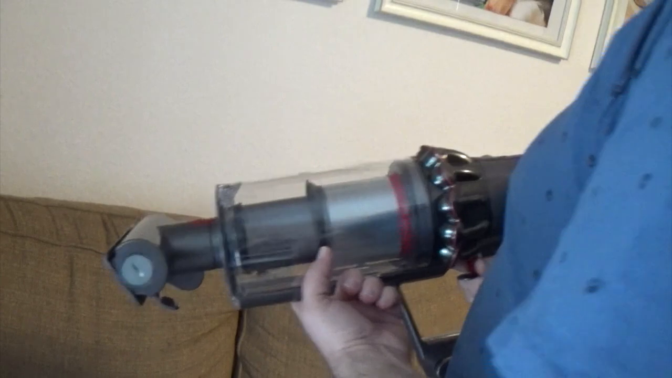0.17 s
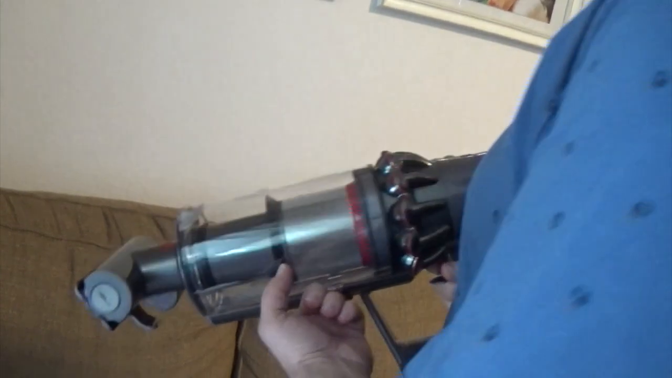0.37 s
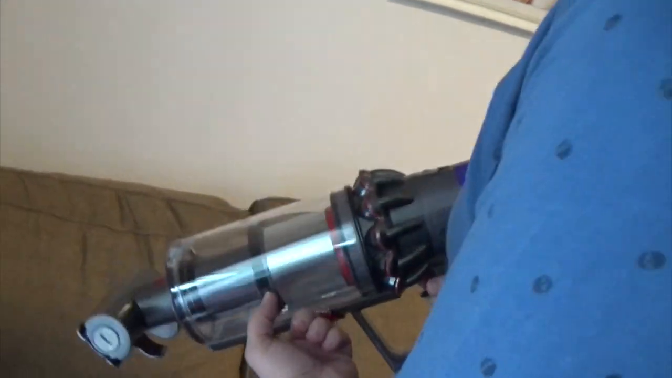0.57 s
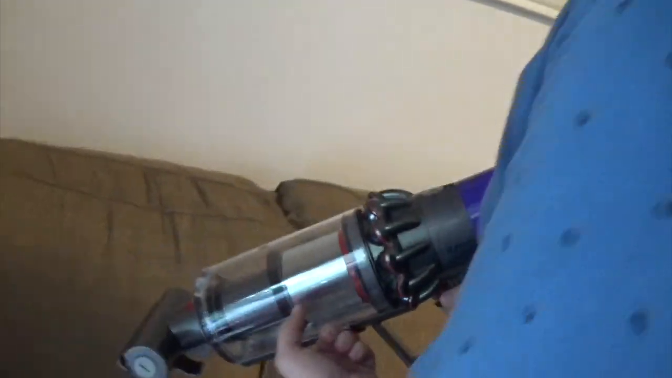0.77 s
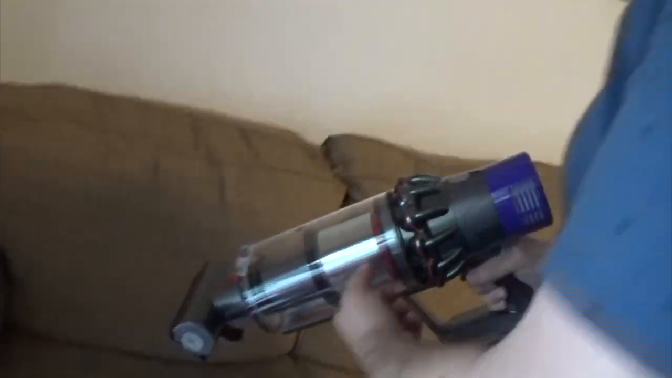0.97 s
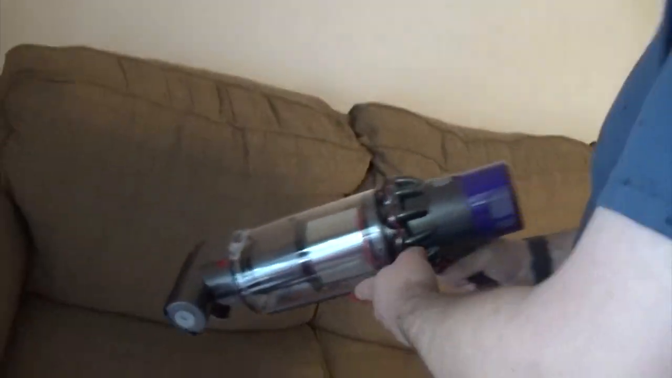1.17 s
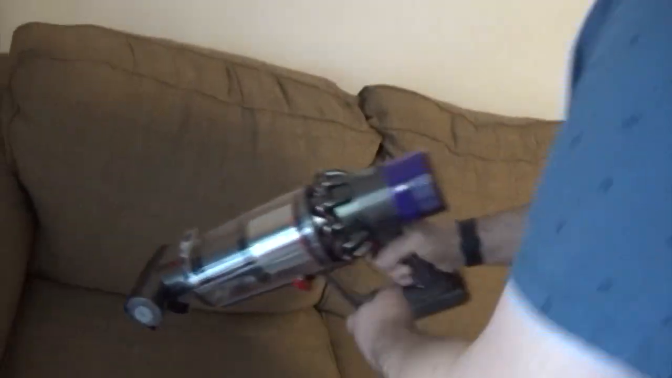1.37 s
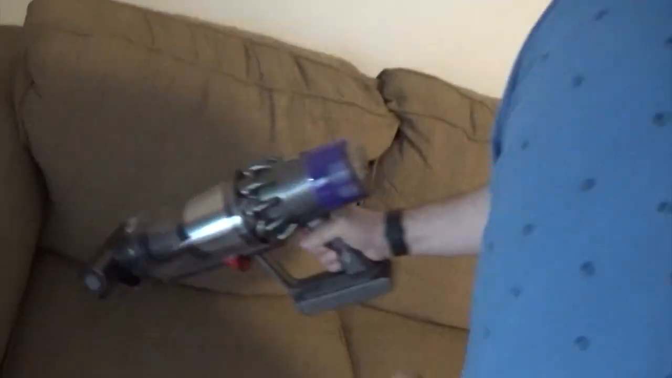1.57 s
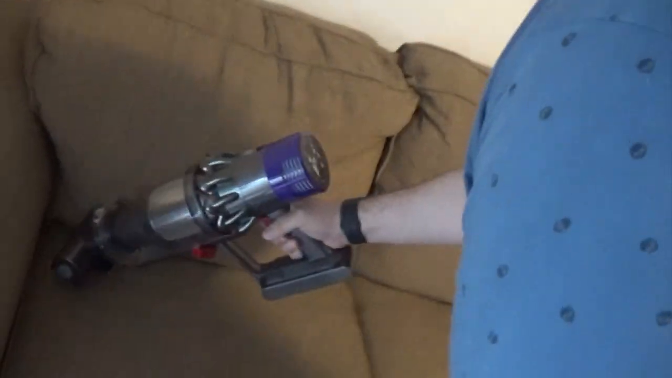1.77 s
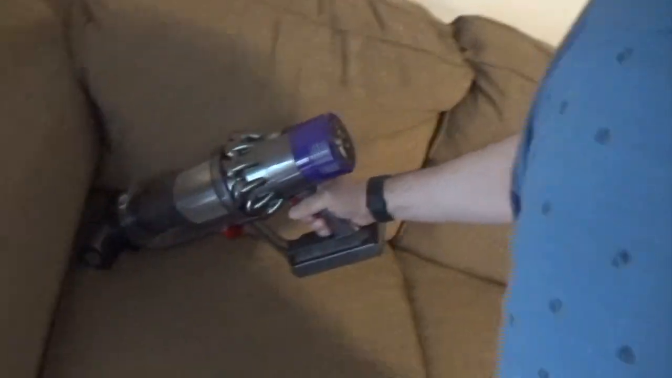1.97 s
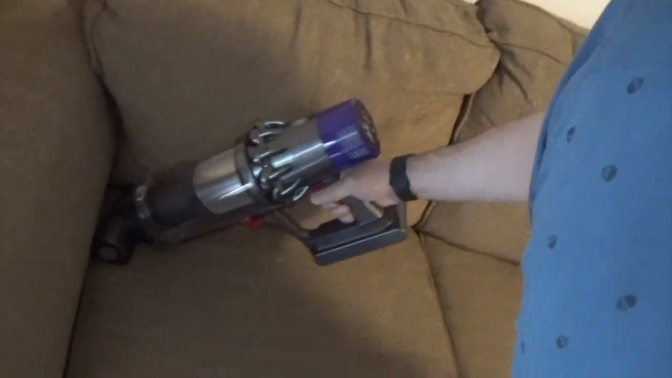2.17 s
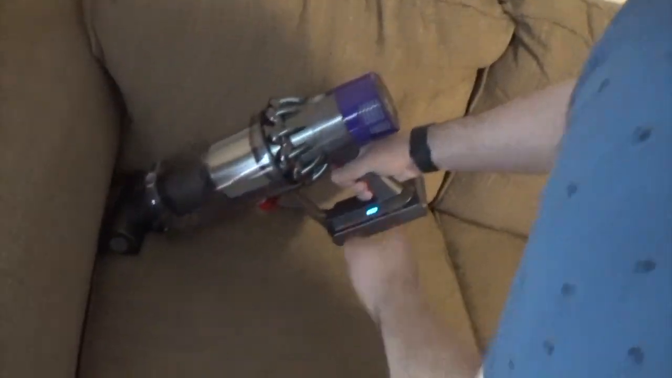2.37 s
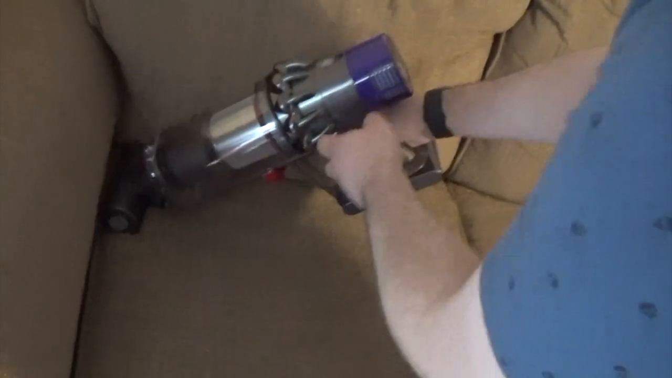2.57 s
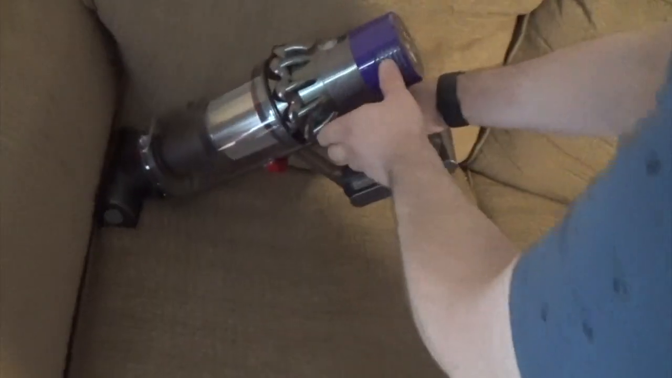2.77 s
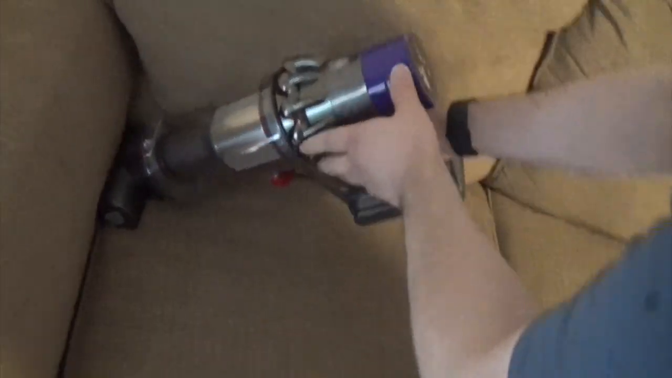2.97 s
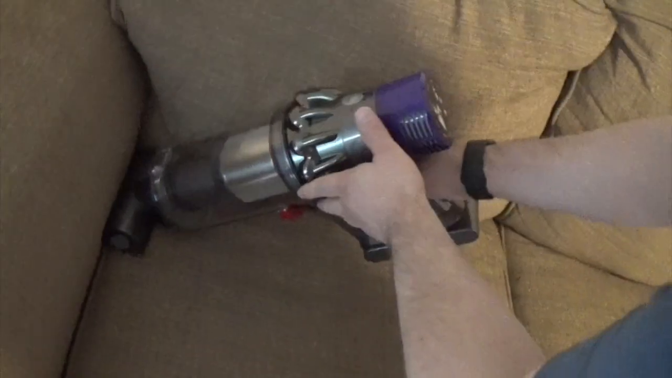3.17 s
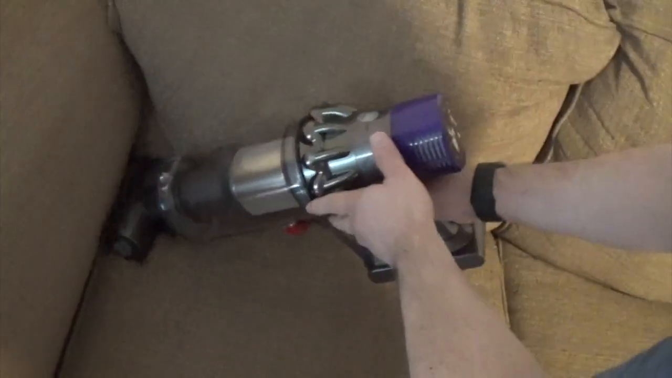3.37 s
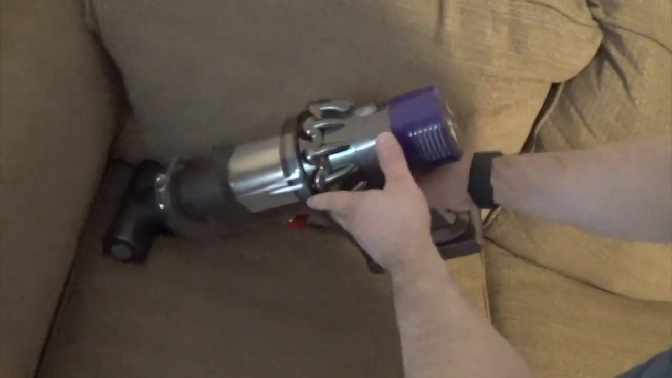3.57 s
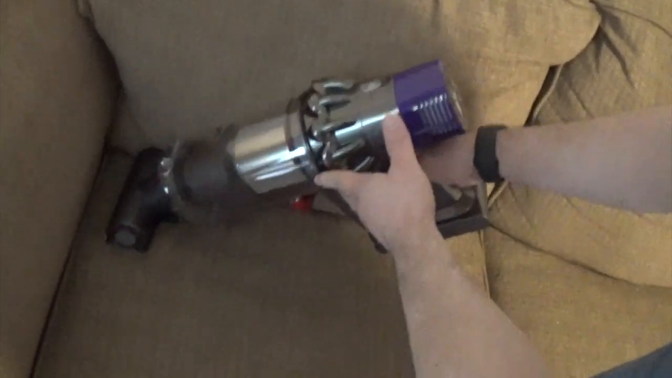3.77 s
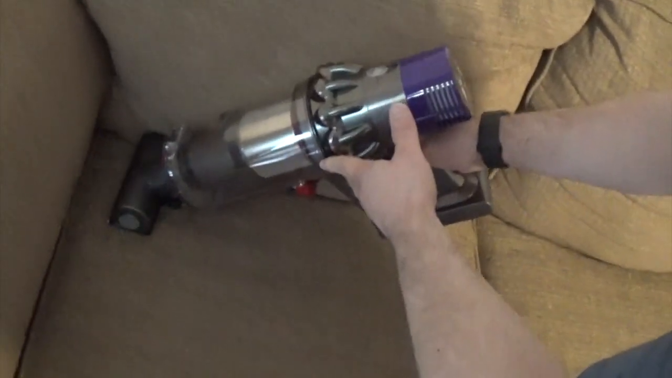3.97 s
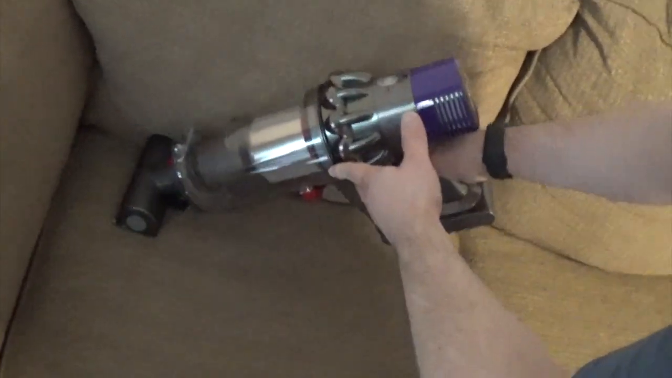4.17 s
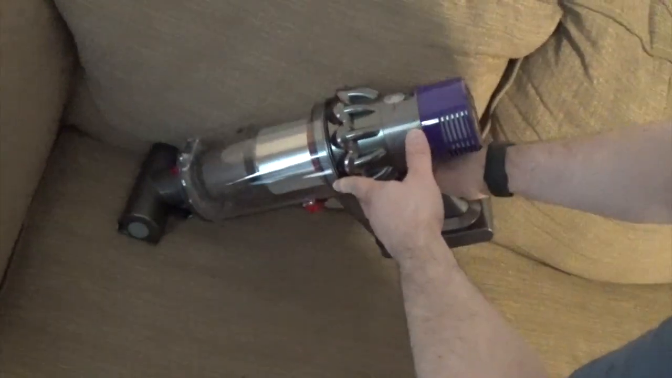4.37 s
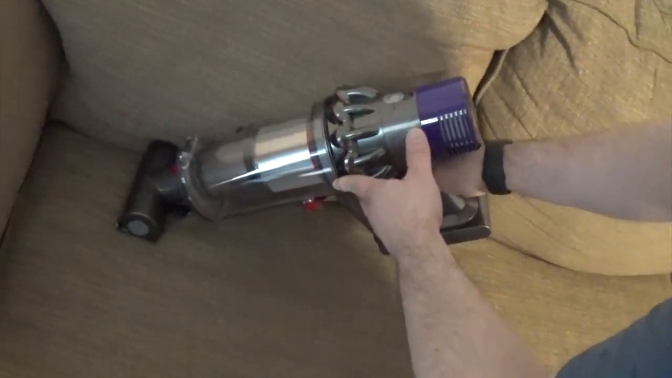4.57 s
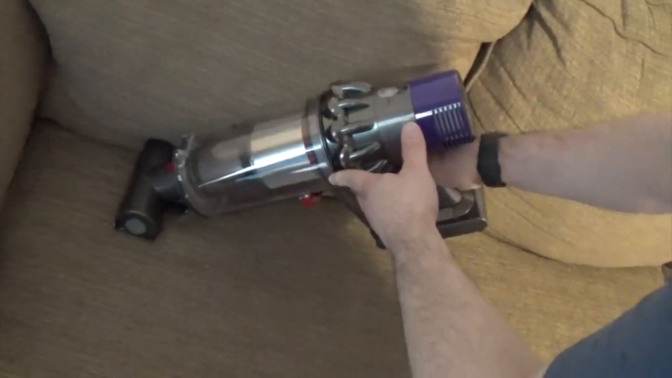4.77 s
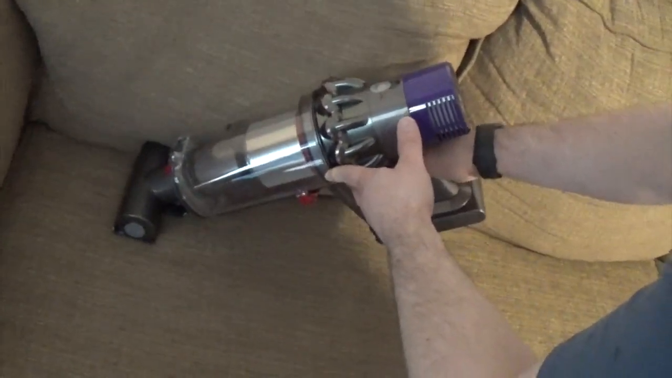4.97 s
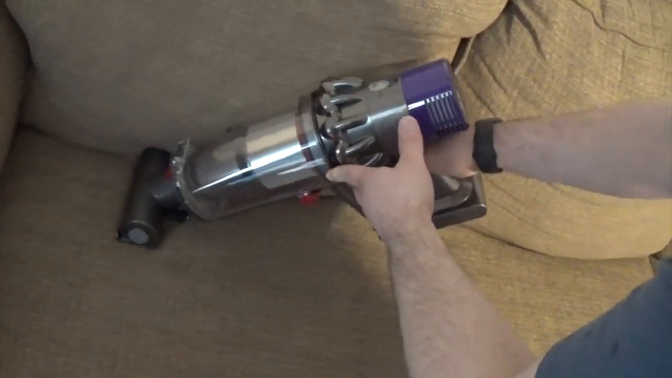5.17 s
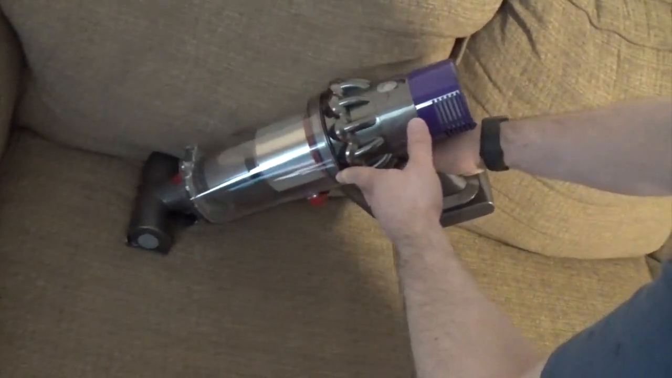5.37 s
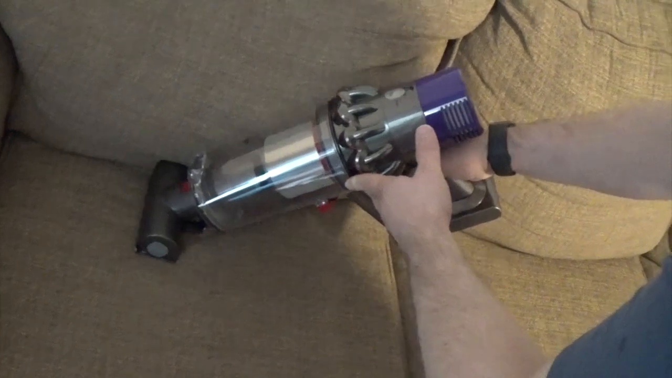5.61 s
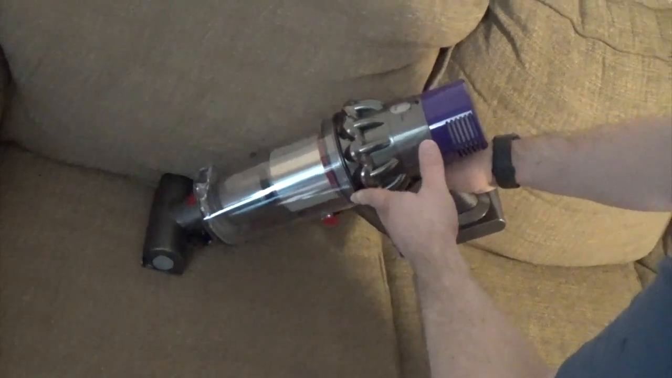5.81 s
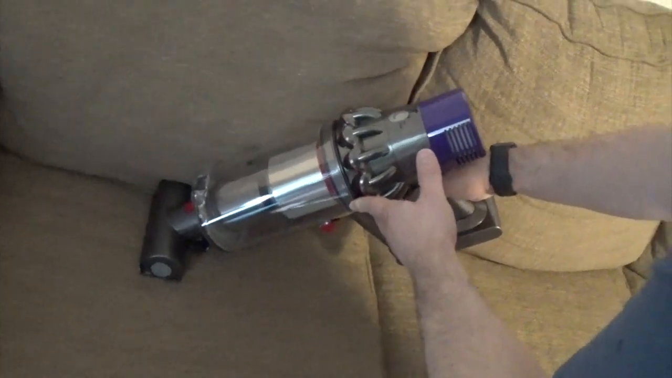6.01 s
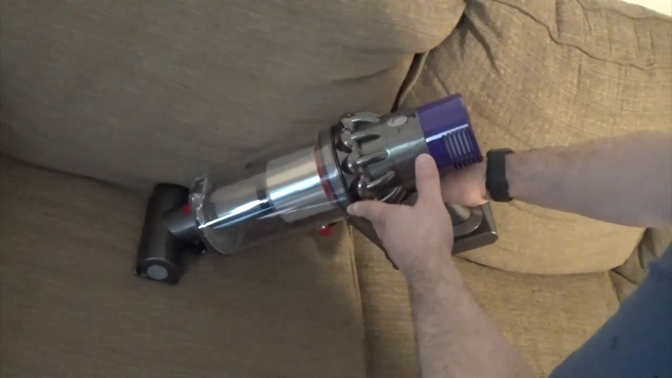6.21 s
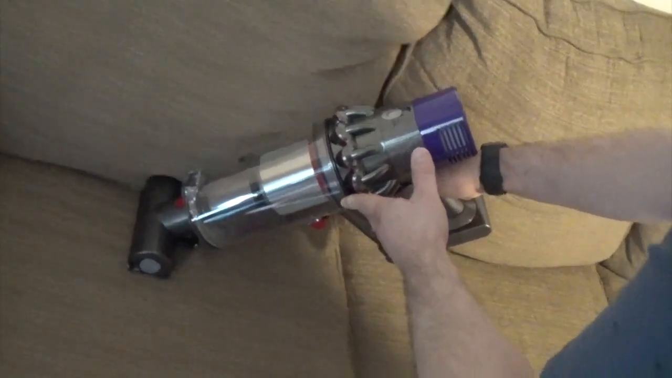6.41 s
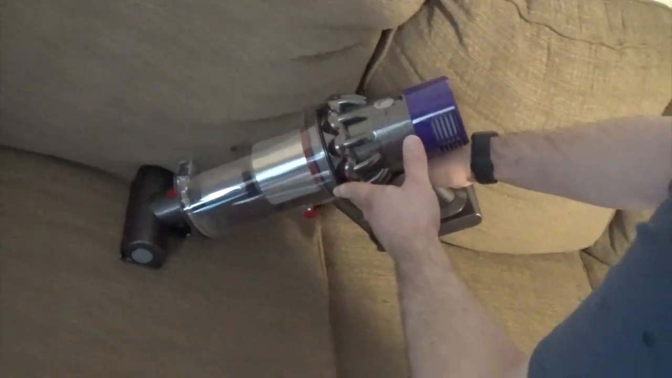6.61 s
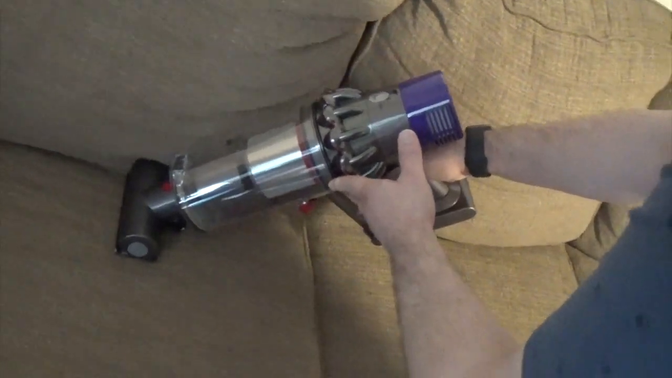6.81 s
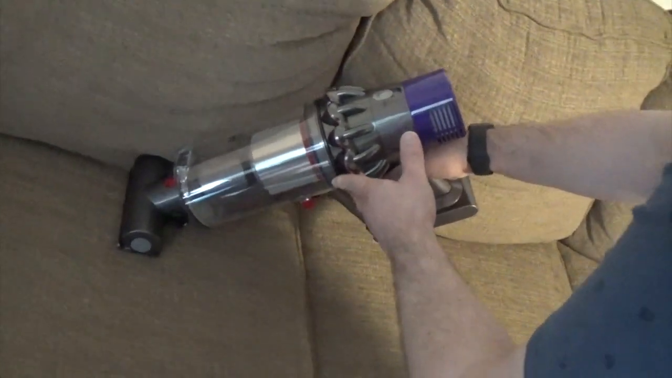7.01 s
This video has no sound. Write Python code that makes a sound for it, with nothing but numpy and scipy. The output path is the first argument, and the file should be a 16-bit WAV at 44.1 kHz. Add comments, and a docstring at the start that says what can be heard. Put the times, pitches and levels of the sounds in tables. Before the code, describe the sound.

A cordless vacuum cleaner blips with a falling whistle, then switches on and runs with a steady airy hiss and high whine.

```python
"""A living room, with a cordless stick vacuum on a fabric couch about a metre away.
A brief pull of the trigger kicks the motor, which coasts down in a falling whistle and rocks to rest,
held by its magnets. The cleaner head slides onto the cushion. Then the motor spins up and runs:
air rushes through the cleaner, the shaft and fan blades whine, and the turning brush bar hums."""
import numpy as np
from scipy import signal
from scipy.fft import rfft, irfft, next_fast_len
from scipy.ndimage import map_coordinates
import sys
import numpy as np
from scipy import signal
from scipy.fft import rfft, irfft, next_fast_len
from scipy.io import wavfile
from scipy.ndimage import map_coordinates

SR = 44100
rng = np.random.default_rng(int(sys.argv[2]) if len(sys.argv) > 2 else 0)


def wrap_up_sound(samples):
    """Save the sound to the file named by the first command line argument, as 16-bit audio."""
    columns = np.atleast_2d(samples).T
    # keep every value between -1 and 1, then stretch to whole-number steps
    tamed = np.clip(columns, -1, 1)
    steps = np.round(tamed * 32767).astype(np.int16)
    wavfile.write(sys.argv[1], SR, steps)


N = 310905

KICK_S, RELEASE_S, CAUGHT_S = .431, .465, 1.73  # first pull: pressed, let go, rotor caught by magnets
START_S = 2.497  # second pull, which is held
KICK_HZ, KNEE_HZ, RUN_HZ = 487, 1555, 1703.5  # shaft speed: top of the kick, end of full push, running
# the shaft's fifth harmonic, loudest when the exhaust slots face the listener: t/s, level/dB
FIFTH_HARMONIC = [(2.8, -33.5), (3.4, -35), (3.45, -30), (3.75, -33), (3.83, -27), (4.29, -31), (4.31, -29),
                  (4.94, -29), (6.02, -26), (6.55, -26.5), (6.58, -30), (6.69, -25), (7.01, -26.5),
                  (7.05, -28)]


def airflow():
    """Air swirls through nozzle, dust chambers and exhaust, louder as the fan speeds up."""
    # tone colours of the air, each: f/Hz, level/dB
    nozzle = [(15, -70), (25, -43), (156, -32), (188, -31), (226, -20), (292, -14), (391, -11), (437, -14),
              (586, -5.5), (926, -7.5), (996, -8), (1580, -5.5), (1660, -7.5), (1790, -7), (2000, -17),
              (2600, -38), (4400, -120)]
    dust_chambers = [(1200, -52), (1550, -13.5), (2000, -3.5), (2260, -0.5), (2480, -4.5), (3100, 0.5),
                     (3450, -.5), (4000, 0.5), (4450, -2.5), (5200, 2.5), (5700, 1.5), (7000, 4.5),
                     (7700, 1.5), (8600, -40)]
    exhaust = [(6600, -53), (7500, -6.5), (8200, -2.5), (8600, -1), (9100, -0.5), (9700, -3), (10400, -4.5),
               (11400, -6.5), (12000, -29), (13000, -50)]
    slot_ring = [(6500, -42), (7700, -23), (8150, -4), (8520, -7), (8900, -7), (9300, -31), (11000, -50)]
    high_fizz = [(10800, -41), (11800, 5), (12500, -1.5), (13800, -0.5), (15000, -9), (15800, -3)]
    # how the fizz rises and falls: t/s, level/dB
    fizz_levels = [(2.6, -24), (2.65, -24.5), (3.0, -25.5), (3.69, -26), (6.03, -31.5), (6.79, -29.5),
                   (7.05, -31)]
    shaft = run_speed()
    flow = lambda full_hz, power: np.minimum(shaft / full_hz, 1) ** power
    surge_db = 2 * bell(clock(), 2.89, 0.21)  # air rushes harder until the suction has built up
    fifth_db, = curves(FIFTH_HARMONIC)
    fizz_db, = curves(fizz_levels)
    roar = amp(-36.5 + surge_db + 1.15 * wobble(12)) * noise(nozzle) * flow(full_hz=1550, power=1)
    rush = amp(-23.5 + surge_db + 0.62 * wobble(40)) * noise(dust_chambers)
    rush *= flow(full_hz=1140, power=1.4)
    hiss = amp(-22 + 0.25 * wobble(7.4)) * noise(exhaust) * flow(full_hz=850, power=2.5)
    vent = amp(fifth_db - 2) * noise(slot_ring) * flow(full_hz=1000, power=2.2)
    fizz = amp(fizz_db + 1.2) * noise(high_fizz) * flow(full_hz=1500, power=2.2)
    return amp(0.39 * wobble(150)) * (roar + rush + hiss + vent + fizz)


def motor():
    """The running motor whines at harmonics (whole multiples) of its speed; nine blades add a tone."""
    # harmonics 1 to 3 as the cleaner is turned: t/s, first/dB, second/dB, third/dB
    low_harmonics = [(2.8, -40.5, -35, -36), (2.95, -37.5, -35, -35.5), (3.23, -49, -33, -37),
                     (3.28, -41.5, -31, -41), (3.72, -41.5, -40, -34), (3.86, -41, -46, -50),
                     (5.55, -42.5, -42.5, -31.5), (5.77, -38.5, -36.5, -35.5), (6.97, -39, -29.5, -35),
                     (7.05, -38, -32, -40)]
    # further harmonics: multiple, level/dB added to the first's curve
    high_harmonics = [(4, 0), (6, -20), (7, -24)]
    # the tone of the fan blades: t/s, level/dB
    blade_levels = [(2.8, -39), (3.66, -31), (3.72, -41), (4.31, -34), (4.35, -45), (5.25, -35), (5.5, -43),
                    (5.92, -36), (6.0, -41), (7.05, -42)]
    shaft = run_speed()
    speed = shaft / RUN_HZ
    first_db, second_db, third_db = curves(low_harmonics)
    fifth_db, = curves(FIFTH_HARMONIC)
    blade_db, = curves(blade_levels)
    turn = angle(shaft + 0.21 * wobble(25.15))
    strain = np.sqrt(np.abs(1 - speed))  # the blades sound ragged until they reach speed
    ragged = strain * 1.2 * wobble(700)
    whine = amp(first_db + 1.8) * tone(turn, waver_db=1, rate=25, drift=.1)
    whine += amp(second_db - 2.5) * tone(2 * turn, waver_db=2, rate=26, drift=0.37)
    whine += amp(third_db - 1.5) * tone(3 * turn, waver_db=2.5, rate=30, drift=0.3)
    whine += amp(fifth_db + 2.6) * tone(5 * turn, waver_db=0.4, rate=25, drift=0.18)
    for k, db in high_harmonics:
        whine += amp(first_db + db) * tone(k * turn, waver_db=0.5, rate=9, drift=1)
    blade = amp(blade_db + 1 + 1.4 * strain * wobble(250))
    blade *= tone(9 * turn + ragged, waver_db=1.8, rate=10, drift=0.5)
    push = np.minimum((1 - speed) / (1 - KNEE_HZ / RUN_HZ), 1)  # full push makes the blades louder
    return whine * speed ** 3 + blade * np.sqrt(speed) * amp(12.5 * push)


def run_speed():
    """Shaft turns a second on the held pull: a hard push, a quick settling, then a slow last creep."""
    run_up_s, settle_s, creep_s, creep_hz = .1, .072, .7, 9
    run_up = np.minimum(since(START_S) / run_up_s, 1) ** .9
    t = since(START_S + run_up_s)
    settling = (RUN_HZ - KNEE_HZ - creep_hz) * np.exp(-t / settle_s)
    return run_up * (RUN_HZ - settling - creep_hz * np.exp(-t / creep_s))


def brush():
    """The geared brush bar speeds up; its two bristle rows thrum louder once the head lies flat."""
    # hum and gear whine: multiple of the bar's speed, level/dB
    harmonics = [(1, -27), (3, -1.5), (4, -7), (5, -5.5), (6, 1), (9, 1), (18, 9), (36, -6)]
    tilted_hz, flat_hz = 95, 100.1
    flat = held(4.48, np.inf, fade=.2)  # 0 with the head tilted, 1 with it flat on the cloth
    speed = 1 - .7 * np.exp(-since(START_S) / .3)
    hz = speed * np.interp(flat, [0, 1], [tilted_hz, flat_hz])
    turn = angle(hz * (1 + 0.00203 * wobble(8)))
    hum = sum(amp(db) * tone(k * turn, waver_db=2, rate=9.2) for k, db in harmonics)
    hum *= amp(-61 + 6.5 * flat)
    thrum = amp(-71 + 11 * flat) * tone(2 * turn, waver_db=2, rate=10)
    return (hum + thrum) * speed ** 2 * held(START_S, np.inf, fade=.01)


def coasting():
    """The kicked rotor puffs air and slows; eight magnet passes a turn make a falling whistle."""
    # pitches at which the casing rings and lifts the whistle: f/Hz, level/dB, width/octaves
    resonances = [(450, -46, 0.065), (664, -44, 0.42), (825, -38.5, 0.053), (1080, -29.5, 0.071),
                  (1287, -30, 0.055), (1480, -41, .06), (1780, -41, .04), (2044, -29.5, 0.021),
                  (2210, -28.5, .035), (2434, -26.5, 0.044), (2900, -43.5, 0.18), (3580, -43, 0.11),
                  (4220, -36, 0.048), (4740, -24, 0.059)]
    # the rotor buzzes in its mount: t/s, width/s, level/dB, f/Hz, width/octaves
    buzzes = [(1.164, 0.01, -49.5, 3300, 0.66), (1.292, 0.013, -53, 3400, .45),
              (1.4, 0.092, -52.5, 1500, 0.74), (1.549, .028, -38, 1270, 0.18),
              (1.55, 0.021, -61, 2980, 0.77)]

    def casing(f):
        """How strongly the casing passes on a pitch."""
        peaks = sum(amp(db) * band(f, hz, octaves) for hz, db, octaves in resonances)
        return amp(-47.5) * f ** 4 / (f ** 4 + 400 ** 4) + peaks

    t, shaft = clock(), coast_speed()
    speed = shaft / KICK_HZ
    pitch = 8 * shaft
    phase = angle(pitch)
    whistle = casing(pitch) * tone(phase, waver_db=2.7, rate=80, drift=0.39)
    octave_gain = amp(-11.5) * band(2 * pitch, 4050, octaves=0.28) + amp(-31)
    whistle += casing(2 * pitch) * octave_gain * tone(2 * phase, waver_db=5, rate=110, drift=0.86)
    blades = amp(-40) * speed ** 1.8 * tone(9 * angle(shaft), waver_db=5, rate=140, drift=0.62)
    unbalance = amp(-57) * bell(t, 0.666, 0.055) * tone(angle(shaft), waver_db=7, rate=20.2)
    whistle += blades + unbalance
    for k in range(2, 11):  # loose contact blurs the higher harmonics more
        buzz = sum(amp(db) * bell(t, s, width) * band(k * pitch, hz, octaves)
                   for s, width, db, hz, octaves in buzzes)
        whistle += buzz * tone(k * phase, waver_db=5, rate=100, drift=0.46 * k)
    whistle *= np.sqrt(kick_rise())  # the rise is too quick to ring the casing fully
    # tone colour of the air drawn in by the kick: f/Hz, level/dB
    puff_colour = [(40, -37), (120, -29), (300, -9), (700, -4), (1200, -4.5), (2000, -7), (3200, -2),
                   (4600, -3), (6200, 3), (7500, -5), (10000, -8.5), (13000, -21), (15800, -32)]
    air = np.where(t < RELEASE_S, np.sqrt(speed), speed ** 1.72)  # drawn at once, dying with the speed
    puff = amp(-33.5 + 0.63 * wobble(89.5)) * air * noise(puff_colour)
    return (flutter(whistle, echo_db=-14) + puff) * held(KICK_S, CAUGHT_S, fade=.006)


def kick_rise():
    """Climbs from 0 to 1 during the brief pull of the trigger."""
    return np.minimum(since(KICK_S) / (RELEASE_S - KICK_S), 1)


def coast_speed():
    """Shaft turns a second on the brief pull: a steep rise, then friction and air drag slow it."""
    friction, drag = 173, .00405  # Hz lost a second = friction + drag * speed squared
    balance_hz = np.sqrt(friction / drag)  # the speed at which both brake alike
    spin_left = np.arctan(KICK_HZ / balance_hz) - np.sqrt(friction * drag) * since(RELEASE_S)
    slowing = balance_hz * np.tan(np.maximum(spin_left, 0))
    return np.maximum(slowing * kick_rise(), 1)


def rocking():
    """Too slow to pass a magnet, the rotor swings like a pendulum, faster as the swing shrinks."""
    # tone colour of the slow rotor chattering in its bearing: f/Hz, level/dB
    bearing = [(1300, -58), (2000, 0), (2200, 5), (2400, -8), (2900, -37), (5500, -32), (6500, -27),
               (7300, -27), (9000, -60)]
    wide_hz, narrow_hz, settle_s = 76, 154.5, 0.11
    t = since(CAUGHT_S)
    hz = narrow_hz + (wide_hz - narrow_hz) * np.exp(-t / settle_s)
    phase = angle(hz)
    swing = amp(-62 - 14 * t) * (hz / narrow_hz) ** 2 * np.sqrt(2) * np.sin(phase)
    swing += amp(-60 - 40 * t) * tone(3 * phase, waver_db=2, rate=40)  # wide swings add a harmonic
    chatter = amp(-57) * noise(bearing) * (1 + 0.34 * np.cos(phase))
    return swing * held(CAUGHT_S, START_S, fade=0.0087) + chatter * held(1.26, 1.94, fade=0.29)


def clicks():
    """Each plastic contact is a short crack, with a quickly dying ring just behind it."""
    # trigger and body clicks: t/s, level/dB, ring f/Hz, ring level/dB, time to fade by 60 dB/s
    contacts = [(.157, -52, 3500, -12, .04), (0.227, -44, 3520, -9, 0.056), (.3098, -46, 2500, -15, .035),
                (0.4145, -47, 1840, 7, 0.063), (.438, -37.5, 1060, 11, 0.036), (0.4445, -33, 2390, 8, .036),
                (.768, -40, 484, -0.5, 0.083), (1.347, -35, 490, 11, .035),
                (2.3516, -29.5, 1350, -6, 0.027), (2.4195, -54, 1800, 10, .03), (2.5, -36, 1150, 5.5, 0.04),
                (2.507, -33, 2360, 1, 0.027)]
    out = np.zeros(N)
    crack = noise([(150, -32), (600, 3.5), (3000, 4.5), (9000, 2.5), (15000, -18)])
    for s, db, hz, ring_db, fade_s in contacts:
        t = since(s)
        ring = amp(ring_db - 4) * np.sqrt(2) * np.sin(2 * np.pi * hz * t)
        ring *= 1 - np.exp(-(t / 0.00087) ** 2)
        out += amp(db - 60 * t / fade_s) * (crack * (1 - np.exp(-t / 0.00041)) + ring)
    return out


def handling():
    """Cloth rubs in small catches under the hands and as the head is dragged onto the cushion."""
    # tone colours of dragging and of sliding: f/Hz, level/dB
    rustle_colour = [(60, -40), (150, -24.5), (270, -16.5), (600, -2.5), (1100, -6), (1600, -3.5),
                     (2200, -7.5), (2700, -14), (3300, -11), (5000, -19), (7000, -15), (10000, -49)]
    swish_colour = [(300, -70), (1500, -8), (2500, -9), (3700, -8), (5500, -9), (6600, -4.5), (8730, 2.5),
                    (10500, -5.5), (13200, -13), (15600, -26)]
    # hands and head slide over plastic and cloth: t/s, width/s, level/dB
    slides = [(.185, .01, -63), (.238, .011, -63), (.329, .009, -58), (1.082, 0.0059, -35),
              (1.09, 0.022, -45), (1.35, 0.07, -50.5), (1.545, 0.039, -57), (1.653, .012, -57),
              (1.772, .006, -63), (2.04, .052, -48), (2.25, .1, -53.5), (2.344, 0.025, -43),
              (2.48, 0.031, -49.5)]
    rustle = amp(-54) * held(1.4, 2.43, fade=0.15) * noise(rustle_colour)
    swish = sum(amp(db) * bell(clock(), s, width) for s, width, db in slides) * noise(swish_colour)
    return (rustle + swish) * amp(1.6 * wobble(180))


def small_body(x):
    """A hand-sized plastic body gives off little bass."""
    return filtered(x, lambda hz: (1j * hz) ** 2 / (330 ** 2 - hz ** 2 + 1j * hz * 400))


def patchy(x, depth_db):
    """Echoes off arm and cushions colour the sound in patches that drift as the cleaner moves."""
    spectrum = signal.stft(x, nperseg=512)[2]
    bins, frames = np.indices(spectrum.shape)
    patches = map_coordinates(rng.standard_normal((80, 40)), [bins / 4, frames / 80])
    return signal.istft(spectrum * amp(depth_db * patches), nperseg=512)[1][:N]


def flutter(glide, echo_db, delay_s=.016):
    """A gliding tone beats against its own echo from the far wall."""
    return glide + amp(echo_db) * np.pad(glide, (round(delay_s * SR), 0))[:N]


def wall(x, delay_s=.00763):
    """The wall behind the couch sends back one dull echo."""
    return amp(-19.5) * filtered(x, lambda hz: np.exp(-2j * np.pi * hz * delay_s) / (1 + (hz / 2500) ** 2))


def room(x):
    """A softly furnished room echoes differently on the left and on the right."""
    # how long the room rings: f/Hz, time to fade by 60 dB/s
    fade_times = [(200, 1), (2000, 0.33), (12000, 0.021)]
    hz, t, spectrum = signal.stft(rng.standard_normal((2, SR // 3)), SR, nperseg=256)
    tail = signal.istft(spectrum * amp(-60 * t / along(fade_times, hz)[:, None]), SR, nperseg=256)[1]
    return signal.fftconvolve(x[None], tail / np.linalg.norm(tail[0]), axes=1)[:, :N]


def room_hush():
    """The faint, steady noise of a quiet room."""
    # its tone colour: f/Hz, level/dB
    hush_colour = [(15, -76), (25, -44), (101, -21), (228, -22), (254, -16), (306, -14), (525, -11),
                   (1150, -10.5), (1240, -9), (1760, -17), (3370, -19), (12300, -22.5), (15600, -26)]
    return amp(-59.5) * noise(hush_colour)


def amp(db):
    """Decibels to gain."""
    return 10 ** (np.asarray(db) / 20)


def clock():
    """The time of each sample, in seconds."""
    return np.arange(N) / SR


def since(s):
    """Seconds gone by after a moment, zero before it."""
    return np.maximum(clock() - s, 0)


def held(start, end, fade):
    """One from start to end, fading to nothing outside; all in seconds."""
    return np.clip(np.minimum(clock() - start, end - clock()) / fade + 1, 0, 1)


def along(points, hz):
    """Read between (f/Hz, value) points on a pitch scale."""
    f, values = np.transpose(points)
    return np.interp(np.log(hz + 1), np.log(f + 1), values)


def curves(rows):
    """One value per sample for each column after the time."""
    times, *columns = np.transpose(rows)
    return [np.interp(clock(), times, column) for column in columns]


def bell(x, centre, width):
    """A smooth hump of height 1."""
    return np.exp(-.5 * ((x - centre) / width) ** 2)


def band(hz, centre_hz, octaves):
    """A smooth hump around one pitch."""
    return bell(np.log2(hz), np.log2(centre_hz), octaves)


def wobble(rate):
    """A smooth curve through `rate` random values a second."""
    return map_coordinates(rng.standard_normal(int(N * rate / SR) + 4), [clock() * rate])


def filtered(x, response):
    """Scale each frequency in x by response(hz)."""
    size = next_fast_len(N + SR // 2)
    return irfft(rfft(x, size) * response(np.fft.rfftfreq(size, 1 / SR)), size)[..., :N]


def noise(colour):
    """Noise of average power 1, shaped by (f/Hz, level/dB) points."""
    x = filtered(rng.standard_normal(N), lambda hz: amp(along(colour, hz)))
    return x / np.sqrt(np.mean(x ** 2) + 1e-20)


def angle(hz):
    """The angle reached by something turning at a changing rate."""
    return 2 * np.pi * np.cumsum(hz) / SR


def tone(phase, waver_db, rate, drift=0.19):
    """A sine wave whose level wavers by about waver_db and whose phase by about drift radians."""
    wave = np.sqrt(2) * np.sin(phase + rng.uniform(0, 2 * np.pi) + drift * wobble(rate))
    return wave * amp(waver_db * wobble(rate))


def scene():
    """The cleaner, roughly straight ahead, in a quiet room."""
    # how the sound leans to one side: t/s, left minus right/dB
    lean = [(0.0, 2), (1.22, -1.5), (1.84, 4.5), (2.28, -0.5), (4.55, -2.0), (5.36, -1.0), (5.69, -2.5),
            (7.05, -1.0)]
    # sideways echoes that differ between left and right: f/Hz, level/dB
    side_colour = [(30, -12), (80, -20), (170, -50), (350, -45), (700, -22), (1400, -30), (3000, -36),
                   (6000, -31), (11000, -44)]
    cleaner = coasting() + rocking() + small_body(motor() + clicks()) + brush()
    cleaner += patchy(airflow(), depth_db=1) + handling()
    cleaner += wall(cleaner)
    lean_db, = curves(lean)
    # only short waves are shaded from one side, so the bass stays centred
    treble = filtered(cleaner, lambda hz: hz ** 2 / (hz ** 2 + 900 ** 2))
    direct = cleaner + treble * (amp(np.array([lean_db, -lean_db]) / 2) - 1)
    sideways = filtered(room(cleaner)[0], lambda hz: amp(along(side_colour, hz))) * np.array([[1], [-1]])
    return direct + sideways + amp(-17) * room(treble) + room_hush()


def record(dry):
    """Cut off the very highest treble."""
    return filtered(dry, lambda hz: hz < 15760)


dry = scene()
out = record(dry)
wrap_up_sound(out)
```